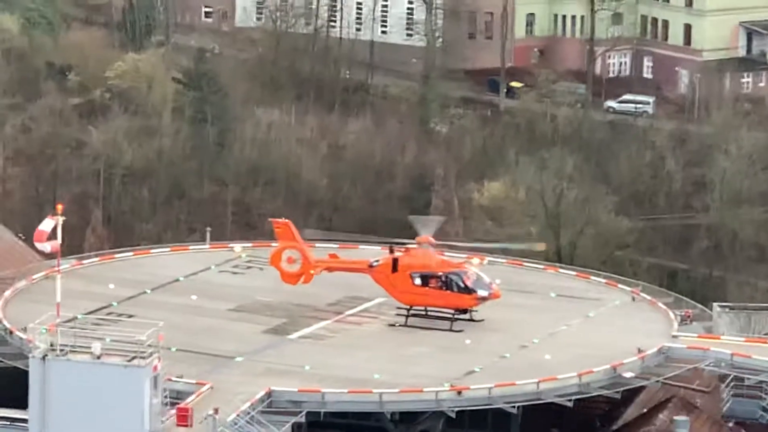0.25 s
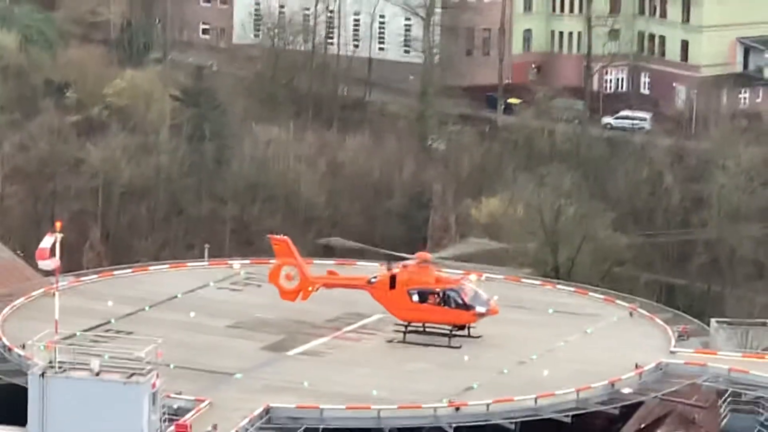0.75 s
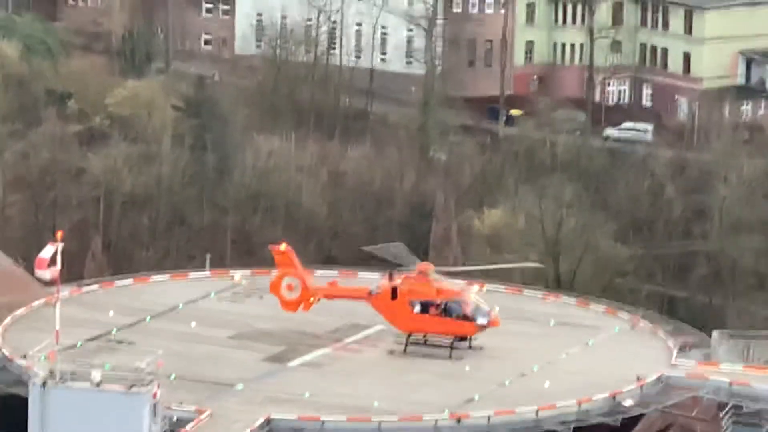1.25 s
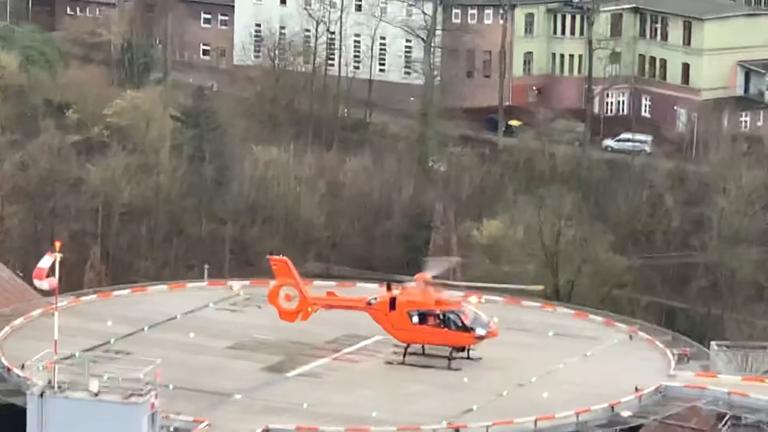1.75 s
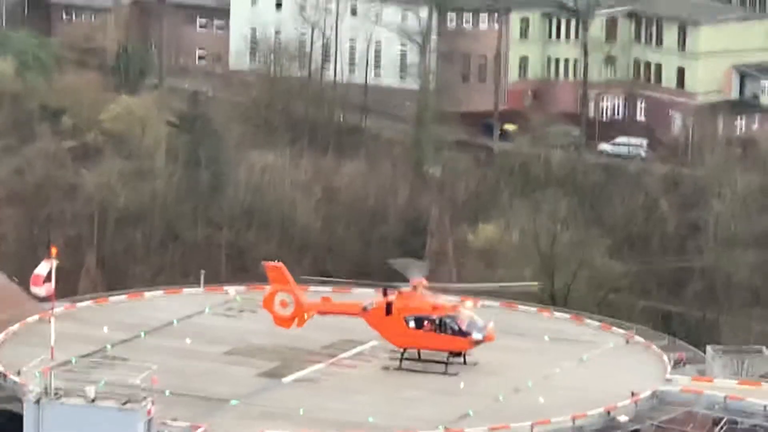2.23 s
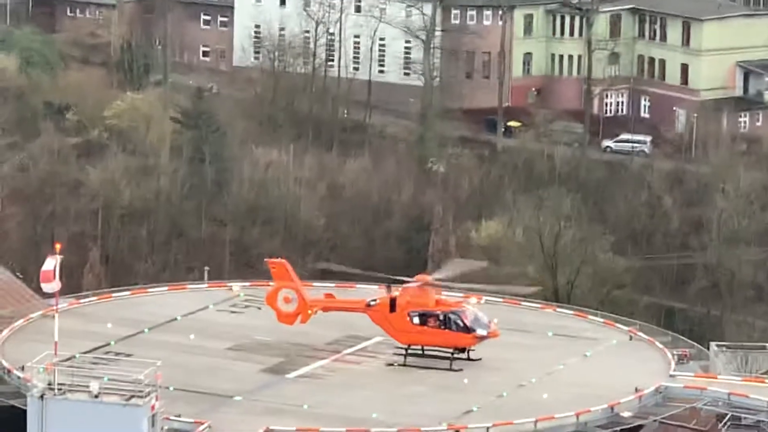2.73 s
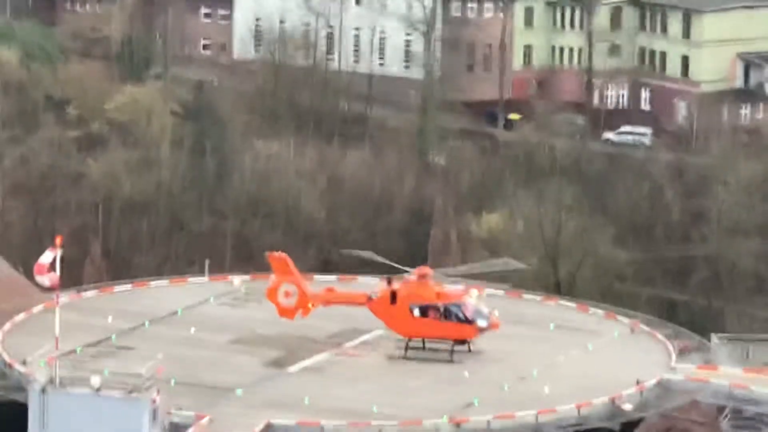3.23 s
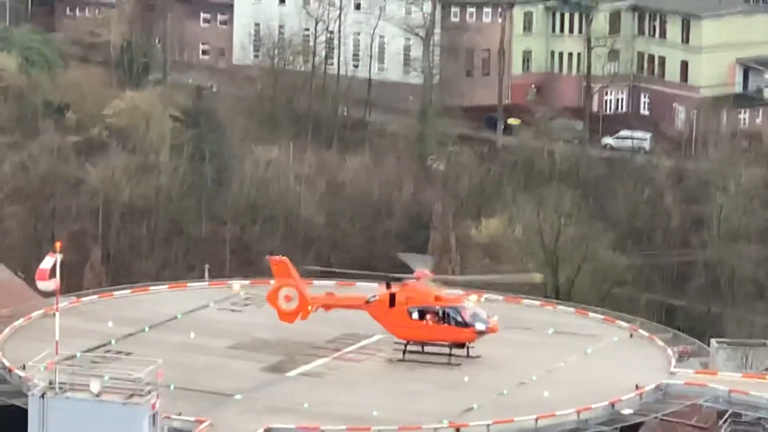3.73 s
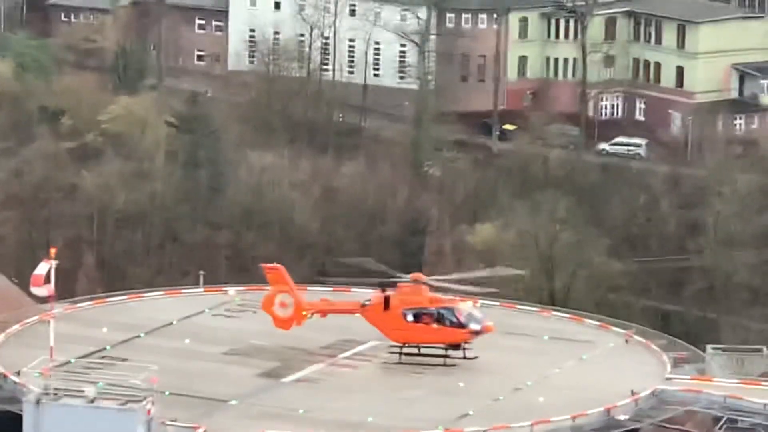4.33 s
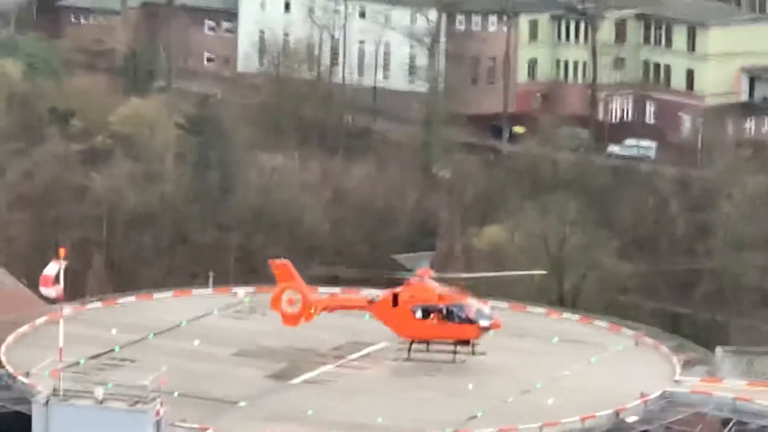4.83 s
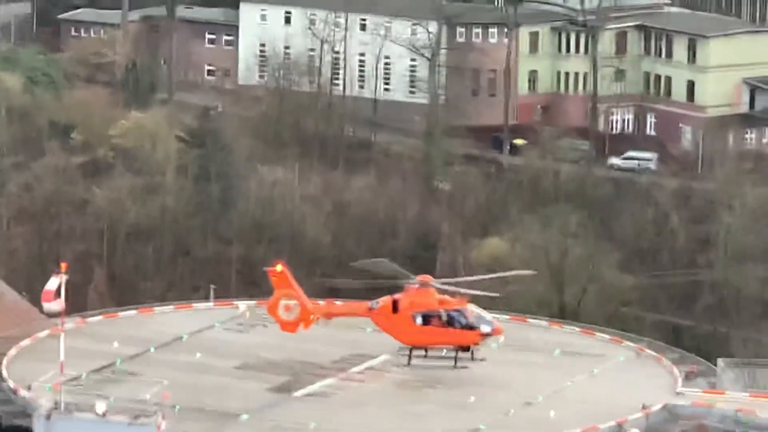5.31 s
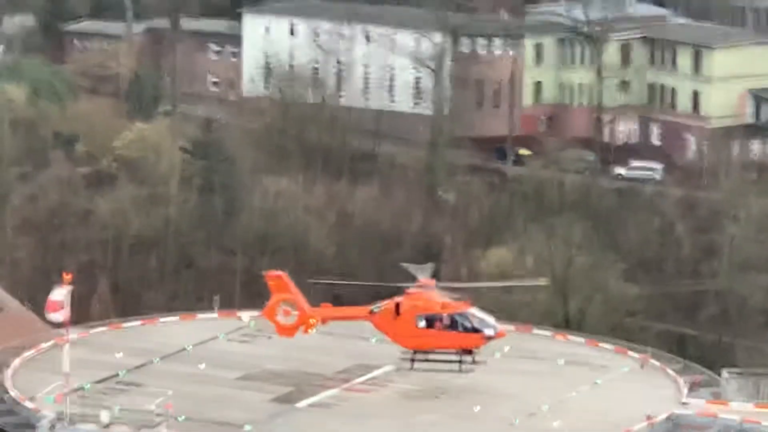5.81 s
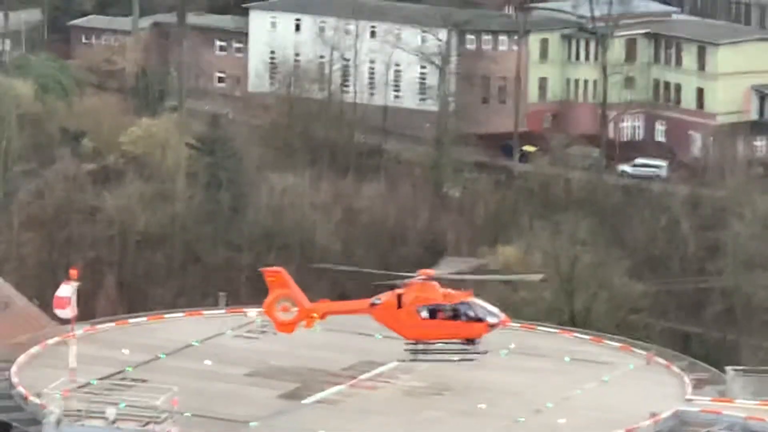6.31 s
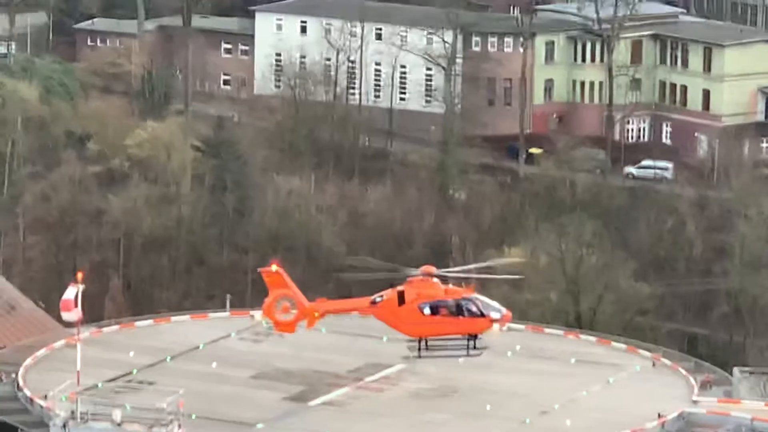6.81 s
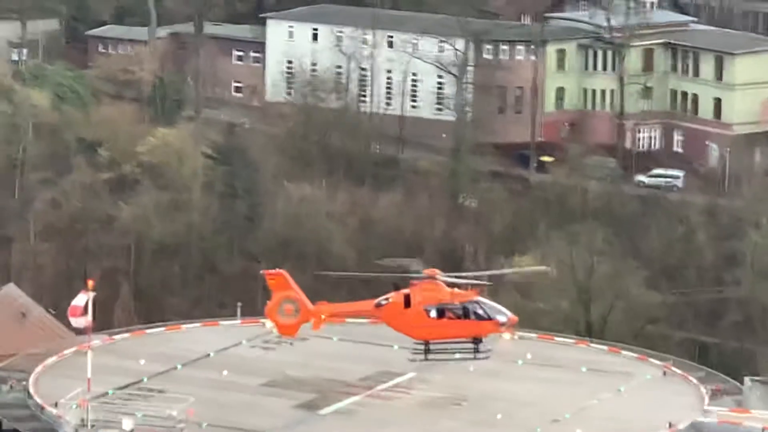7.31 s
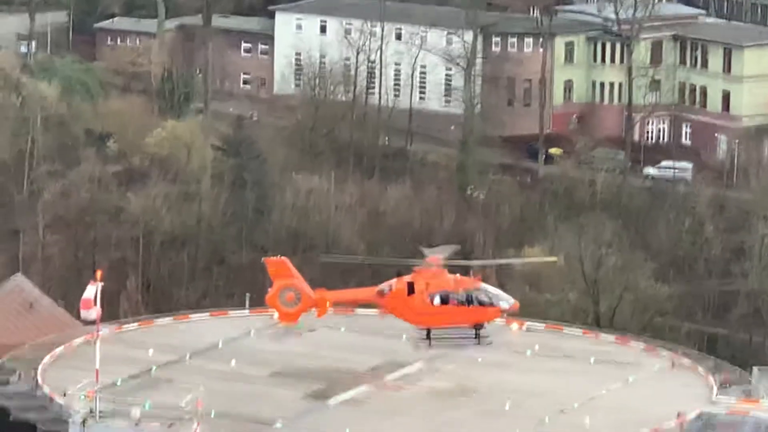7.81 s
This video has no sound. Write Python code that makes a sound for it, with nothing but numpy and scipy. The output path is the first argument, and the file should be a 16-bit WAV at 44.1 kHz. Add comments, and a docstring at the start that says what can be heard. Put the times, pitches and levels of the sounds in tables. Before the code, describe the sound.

Gusty wind buffets the microphone over a distant turbine helicopter's roar and rising whine, while a nearby camera shutter clicks repeatedly.

```python
"""From the start a turbine helicopter spools up on a rooftop pad some way off: rotor roar, fan tones
and a compressor whine that rises for five seconds. A bright hiss dies away in the first half second,
while wind begins to buffet the microphone ports with gusts, puffs, cracks and thumps.
From 1.1 s a reflex camera fires nearby about once a second. Throughout, the recorder's gain control
ducks after each strong gust; the bass is mono at first and widens towards the end."""
import sys
import numpy as np
from scipy import signal
from scipy.fft import rfft, irfft, next_fast_len
from scipy.io import wavfile
from scipy.ndimage import uniform_filter1d

SR = 44100
rng = np.random.default_rng(int(sys.argv[2]) if len(sys.argv) > 2 else 0)


def master(y):
    """Save y as 16-bit WAV."""
    cut = np.clip(np.atleast_2d(y).T, -1, 1)
    pcm = np.round(cut * 32767)  # scale
    wavfile.write(sys.argv[1], SR, pcm.astype(np.int16))


N = 355313
TIME_S = np.arange(N) / SR
SIDE = np.array([[1], [-1]])   # left plus, right minus


def from_db(db):
    """dB to gain."""
    return 10 ** (np.asarray(db) / 20)


def unit_rms(x):
    """Scale to rms 1."""
    return x / np.sqrt(np.mean(x ** 2) + 1e-20)


def in_time(rows, s=TIME_S):
    """Read a (seconds, value) curve."""
    return np.interp(s, *np.transpose(rows))


def at_hz(rows, hz):
    """Read a (Hz, value) curve on a log axis."""
    row_hz, values = np.transpose(rows)
    return np.interp(np.log(hz), np.log(row_hz), values)


def drift(rate_hz):
    """Slow random wander, rms 1."""
    pole = np.exp(-80 * np.pi * rate_hz / SR)
    slow = signal.lfilter([1], [1, -2 * pole, pole * pole], rng.standard_normal(N // 40 + 2002))[2000:]
    return np.interp(np.arange(N) / 40, np.arange(len(slow)), unit_rms(slow))


def stereo_noise(spread):
    """White noise with a side part of gain `spread`."""
    mid, side = rng.standard_normal((2, N))
    return mid + spread * side * SIDE


def noise_bands(low_hz, count, coherence):
    """Yield centre in Hz and stereo noise for each half octave."""
    edges = low_hz * 2 ** (np.arange(count + 1) / 2)
    white = rng.standard_normal((2, 2, N))
    for k, (low, high) in enumerate(zip(edges, edges[1:])):
        band = signal.butter(2, [low, high], "band", fs=SR, output="sos")
        mid, side = signal.sosfilt(band, white[k % 2])
        hz = np.sqrt(low * high)
        alike = np.clip(at_hz(coherence, hz), 0, 1)
        yield hz, np.sqrt(1 + alike) * mid + np.sqrt(1 - alike) * side * SIDE


def resonance(x, hz, width_hz):
    """Two-pole peak of gain 1."""
    r = np.exp(-np.pi * width_hz / SR)
    poles = [1, -2 * r * np.cos(2 * np.pi * hz / SR), r * r]
    return signal.lfilter(np.array([1, 0, -1]) * (1 - r * r) / 2, poles, x)


def peaked(noise, hz, width_hz):
    """The same resonance twice, scaled to rms 1."""
    return unit_rms(resonance(resonance(noise, hz, width_hz), hz, width_hz))


def low_pass(x, hz, stop_ratio=1.07):
    """Steep top cut, 70 dB down at stop_ratio * hz."""
    return signal.sosfilt(signal.cheby2(12, 70, stop_ratio * hz, fs=SR, output="sos"), x)


def moving_low_pass(x, top_hz, db_per_khz):
    """Top cut with a moving corner."""
    hz, s, spectra = signal.stft(x, SR, nperseg=1024, boundary="even")
    over_khz = np.maximum(hz[:, None] - np.interp(s, TIME_S, top_hz), 0) / 1000
    return signal.istft(spectra * from_db(-db_per_khz * over_khz), SR, nperseg=1024)[1][:, :N]


def delay_right(x, lag_s):
    """Fractional delay of the right channel."""
    size = next_fast_len(N)
    shift = np.exp(-2j * np.pi * np.fft.rfftfreq(size, 1 / SR) * lag_s)
    return np.array([x[0], irfft(rfft(x[1], size) * shift, size)[:N]])


# Each row: frequency in Hz, relative density in dB.
ROAR_SPECTRUM = [(60, -22), (200, -3.5), (450, -2), (900, -8.5), (1500, -14), (2300, -10.5), (2700, -15.5),
                 (3100, -26.5), (4300, -27), (5000, -32), (6600, -34), (7200, -70), (7800, -40.5),
                 (9000, -22)]
# Each row: frequency in Hz, left-right coherence.
ROAR_COHERENCE = [(100, 1), (700, 0.26), (1300, 0.24), (2100, 0.91), (4000, 1), (8500, 0.21)]
# Each row: frequency in Hz, left minus right in dB.
ROAR_PAN = [(60, 5), (130, -0.5), (290, 0.5), (640, 1), (1410, 7.5), (3100, -2.5), (6820, -3), (15000, 14)]
# Each row: time in seconds, exhaust hiss gain in dB.
EXHAUST_HISS = [(0.0, 7), (.6, 12), (1.2, 7), (4.8, 2), (5.3, -2.5), (5.8, 5), (8.06, 4)]


def rotor_roar(blade_hz=25.2, throb_depth_db=0.5):
    """Noise throbbing at the blade rate; turbulence on the path swells all bands together."""
    throb_db = throb_depth_db * np.cos(2 * np.pi * blade_hz * TIME_S + 3 * drift(0.77))
    hiss_db = in_time(EXHAUST_HISS)
    path_db, roar = 1.56 * drift(9.8), 0
    for hz, noise in noise_bands(50, 16, ROAR_COHERENCE):
        roar += from_db(throb_db + hiss_db * (hz > 2800) + path_db + 2 * drift(17)) * noise
    size = next_fast_len(N)
    bin_hz = np.fft.rfftfreq(size, 1 / SR) + 1
    colour_db = at_hz(ROAR_SPECTRUM, bin_hz) + 20 + SIDE * at_hz(ROAR_PAN, bin_hz) / 2
    return irfft(rfft(roar, size) * from_db(colour_db), size)[:, :N]


# Each row: frequency in Hz, width in Hz, level in dB against the roar.
FAN_PEAKS = [(640, 30, -12), (774, 35, -12), (879.5, 29, -9), (1130, 70, -9), (1600, 50, -13),
             (2060, 80, -11), (2200, 60, -15), (2360, 40, -18), (3600, 60, -23), (3750, 350, -20),
             (4450, 130, -21)]


def fan_tones():
    """Tail fan and gearbox: narrow noise peaks wavering in level."""
    out = 0
    for hz, width_hz, db in FAN_PEAKS:
        waver_db = 2.5 * drift(2) + 2.5 * drift(12)
        out += from_db(db + waver_db) * peaked(rng.standard_normal(N), hz, width_hz)
    return out


# Each row: time in seconds, pitch in Hz.
WHINE_PITCH = [(0, 8120), (.4, 8160), (1.0, 8275), (1.4, 8400), (2.0, 8495), (2.5, 8595), (3.2, 8700),
               (3.9, 8705), (4.45, 8885), (5.0, 8960), (5.6, 8935), (6.6, 8890), (8.06, 8925)]
# Each row: time in seconds, level in dB.
WHINE_GAIN = [(0, -54), (.45, -58.5), (1.2, -52.5), (2.5, -41), (3.9, -39), (5.2, -35.5), (6.6, -42),
              (8.06, -40.5)]


def compressor_whine():
    """A rising tone that moving air fades and scatters into a narrow band of noise."""
    phase = 2 * np.pi * np.cumsum(in_time(WHINE_PITCH) + 15 * drift(16)) / SR
    level_db = in_time(WHINE_GAIN) + 0.5 * drift(2.9) + 2 * drift(7.5)
    scattered = (0.95 + 1.7 * drift(40)) * np.sin(phase) + 1.7 * drift(35) * np.cos(phase)
    return from_db(level_db) * scattered


# Each row: time in seconds, gain of roar and fan tones in dB.
ENGINE_GAIN = [(0.0, -27), (0.22, -33), (0.45, -39), (0.94, -31.5), (1.6, -33.5), (2.3, -30), (3.03, -31),
               (3.75, -29.5), (4.4, -27.5), (4.53, -31.5), (4.67, -33), (4.9, -30.5), (5.2, -28.5),
               (5.45, -25.5), (5.6, -30), (5.88, -33.5), (6.7, -32), (8.06, -36)]


def helicopter():
    """Roar ending just above the whine, plus the tones; the right port hears it later."""
    roar = moving_low_pass(rotor_roar(), in_time(WHINE_PITCH) + 252, db_per_khz=62.5)
    engine = from_db(in_time(ENGINE_GAIN)) * (roar + fan_tones()) + compressor_whine()
    return low_pass(delay_right(engine, lag_s=98e-6), 9250)


# Each row: centre in Hz, width in Hz, relative level in dB.
HISS_BANDS = [(4200, 1500, 0), (8300, 900, -3), (9700, 1400, -5)]


def opening_hiss(level_db=-43, hold_s=0.27):
    """A bright rush in three bands that holds briefly, sputters and drops away."""
    ports = stereo_noise(0.32)
    noise = sum(from_db(db) * peaked(ports, hz, width_hz) for hz, width_hz, db in HISS_BANDS)
    fade_db = -np.minimum(12 * (TIME_S / hold_s) ** 3, 120)
    return from_db(level_db + fade_db + 3 * drift(12)) * unit_rms(low_pass(noise, 10400))


# Each row: time in seconds, rumble in dB.
STEADY_WIND = [(0, -13), (.5, -31), (1.3, -21.5), (1.67, -30), (1.97, -21.5), (2.4, -27), (3.6, -21.5),
               (4.5, -31), (4.73, -42), (4.93, -33), (5.1, -27), (5.5, -23.5), (5.8, -35), (6.3, -22.5),
               (6.78, -29), (7.15, -22.5), (7.45, -36), (7.85, -42), (8.06, -17)]
# Each row: peak time in seconds, rumble in dB, half-power width in seconds, brightness in dB.
GUST_SWELLS = [(0.04,-11,0.058,-3),(0.13,-14,0.042,-34),(0.28,-18,0.054,-10),(0.346,1.5,0.025,-7.5),(0.461,-13,0.096,-13),(0.594,-16.5,0.035,-7.5),(0.669,-10.5,0.028,-12),(0.823,-11,0.095,-6.5),(0.93,-14,0.04,-25),(1.053,-9.5,0.075,-8),(1.173,-13,0.054,-8),(1.21,-13,0.021,-10),(1.391,-11.5,0.091,-5.5),(1.545,-12,0.066,-3.5),(1.717,-11.5,0.019,-3),(1.849,-11.5,0.034,0),(2.138,-8,0.076,-3.5),(2.26,-14,0.047,-3),(2.32,-13.5,0.054,1),(2.514,-16,0.094,-3),(2.748,-11,0.082,-5.5),(2.83,-14.5,0.024,-5),(2.968,-16,0.049,6.5),(3.04,-13.5,0.12,-6.5),(3.152,-8,0.051,-1.5),(3.301,-0.5,0.016,0.5),(3.41,-17.5,0.04,-5),(3.517,-15,0.062,-10),(3.612,-6.5,0.013,-9),(3.751,-14,0.076,-2),(3.86,-17.5,0.086,0.5),(3.97,-10.5,0.079,-9.5),(4.06,-7.5,0.042,-9),(4.23,-8.5,0.068,-5.5),(4.349,-13,0.032,-6),(4.424,-17.5,0.041,0.5),(4.585,-6.5,0.036,1),(4.66,-14.5,0.042,-17),(4.834,-10.5,0.053,-1),(4.995,-9,0.032,-0.5),(5.065,-13,0.039,-6),(5.11,-14,0.027,-4),(5.21,-17.5,0.091,-1),(5.27,-20,0.024,-7),(5.373,-9.5,0.018,-11),(5.431,-11.5,0.0096,-2),(5.643,-22,0.1,4.5),(5.74,-11.5,0.034,-1),(5.872,-17.5,0.029,4),(6.01,-20,0.083,0),(6.15,-14.5,0.032,-9),(6.277,-14.5,0.044,-10),(6.466,-12,0.05,-3.5),(6.63,-18.5,0.088,-2),(6.86,-16,0.024,2),(6.98,-16.5,0.087,-3),(7.054,-21.5,0.055,5),(7.29,-13.5,0.027,1.5),(7.383,-24.5,0.055,-3),(7.517,-18.5,0.03,-3),(7.593,-16.5,0.023,-14.5),(7.711,-26,0.16,-0.5),(8.05,-20.5,0.073,-9)]


def airflow(steady_bright_db=-1.5, flank=1.58):
    """Rumble and brightness in dB: gusts add power to the steady wind, the loudest sets the colour."""
    peak_s, db, width_s, gust_bright_db = np.transpose(GUST_SWELLS)[:, :, None]
    t = np.arange(0, N + 64, 64) / SR
    gusts = from_db(db - 3 * np.abs(2 * (t - peak_s) / width_s) ** flank) ** 2
    steady = from_db(in_time(STEADY_WIND, t)) ** 2
    power = steady + gusts.sum(axis=0)
    bright_db = (steady * steady_bright_db + (gusts * gust_bright_db).sum(axis=0)) / power
    return np.interp(TIME_S, t, 10 * np.log10(power)), np.interp(TIME_S, t, bright_db)


# Each row: start in seconds, level in dB, treble tilt in dB, decay in cycles of each band.
PUFF_EVENTS = [(0.004, -10.5, -3, 27), (0.05, -10.5, -12.5, 14), (0.107, -9, -32, 11), (0.316, -7, -2, 11),
               (0.331, 2.5, -6, 26), (0.435, -9, -23, 5.9), (0.448, -4, -8, 22), (0.508, -9.5, -44, 8.3),
               (0.558, -14, -34, 7.5), (0.581, -12, -13, 11), (0.648, -11, -8, 15), (0.694, -16, -16, 15),
               (0.829, -42.5, 7, 5.1), (0.906, -13.5, -9, 6.3), (0.945, -12, -9, 16),
               (1.022, -12.5, -22, 37), (1.158, -5, -16, 11.4), (1.591, -7, -13, 3.9),
               (1.702, -12.5, -31, 7.5), (1.818, -7.5, -1, 7.4), (1.865, -13.5, -20, 35),
               (2.243, -5.5, -35, 11), (2.29, -7.5, -32, 19), (2.543, -6, -33, 14.6),
               (2.677, -11.5, -31, 11), (2.926, -11.5, -14, 10), (2.962, -8, -4, 7.3),
               (3.008, -18, 11.5, 6.4), (3.274, -2.5, 0, 3.4), (3.295, -12, -6, 12), (3.446, -10, -44, 22),
               (3.496, -10, -24, 6.8), (3.602, -5, -52, 19), (3.715, -6, -30, 19), (3.819, -4.5, -36, 10),
               (4.209, -6.5, -13, 9.5), (4.416, -10, -34, 7.6), (4.539, -6.5, -19, 6.3),
               (4.561, -8, -19, 17), (4.599, -14, -24, 11), (4.647, -11.5, -4, 13), (4.794, -18, -34, 5.6),
               (4.818, -7, -12, 9.1), (4.957, -19.5, -23, 25), (5.419, -21, -5.5, 11),
               (5.601, -21, -21, 4.6), (5.635, -9.5, -6, 18), (5.736, -4.5, -24, 3.1),
               (5.87, -14, 2.5, 2.4), (5.949, -8.5, -3, 6), (6.263, -10, -32, 40), (6.429, -13.5, -20, 13),
               (6.46, -17, -9, 16), (6.475, -22, -18, 14), (6.605, -15.5, -26, 14), (6.859, -6.5, -36, 6.7),
               (6.973, -9, -14, 14), (7.026, -6, -5, 4.5), (7.053, -7.5, -1.5, 25),
               (7.184, -11.5, -41, 11.5), (7.385, -6, -39, 3.4), (7.705, -5, -10, 3.1)]
# Each row: frequency in Hz, relative density in dB.
PUFF_SPECTRUM = [(60, -6), (150, -6.5), (400, 1.5), (900, -16), (2000, 7.5), (4000, -62.5), (9000, -37.5)]


def puff_envelope(hz, pans_db):
    """Sharp puffs in one band: each dies in a set number of cycles, so treble goes first."""
    t = np.arange(round(0.2 * SR)) / SR
    out = np.zeros((2, N + len(t)))
    treble_share = np.clip(np.log2(hz / 500) / 2, 0, 1.5)
    for (start_s, db, treble_db, cycles), pan_db in zip(PUFF_EVENTS, pans_db):
        i, decay_s = round(start_s * SR), np.clip(cycles / hz, 0.006, 0.08)
        level_db = db + 20 + at_hz(PUFF_SPECTRUM, hz) + (treble_db - 10) * treble_share
        shape = (1 - np.exp(-t / (0.071 * decay_s))) * from_db(-30 * t / decay_s)
        out[:, i:i + len(t)] += from_db(level_db + SIDE * pan_db / 2) * shape
    return out[:, :N]


def evened(noise, hz, share=0.6, cycles=2):
    """Smooth a low band's random level swings so that the gusts stand out."""
    power = uniform_filter1d(np.mean(noise ** 2, axis=0), round(cycles * SR / hz))
    return noise * (power / power.mean() + 0.05) ** (-share / 2)


# Each row: frequency in Hz, relative density in dB.
WIND_SPECTRUM = [(25, -29.5), (40, -2), (60, 6.5), (100, 1.5), (160, -5), (300, -12), (600, -16.5),
                 (1200, -29.5), (2400, -49.5), (5000, -68)]
# Each row: frequency in Hz, left-right coherence.
WIND_COHERENCE = [(30, 0.03), (100, 0.2), (250, 0.72), (500, 0.86), (1200, 0), (4000, 0.056)]


def wind():
    """Flow and puffs on the ports: eddies shake all bands together, small ones roughen the top."""
    rumble_db, bright_db = airflow()
    puff_pans_db = 2 + 0.5 * rng.standard_normal(len(PUFF_EVENTS))
    lumps_db = 2.5 * (drift(20) + 0.79 * drift(62))
    flutter_db, out = 2.5 * drift(140), 0
    for hz, noise in noise_bands(22, 17, WIND_COHERENCE):
        height = np.clip(np.log2(hz / 90) / 3.1, 0, 1.6)   # above the rumble
        colour_db = at_hz(WIND_SPECTRUM, hz) + height * (bright_db + 4.5)
        flow = from_db(rumble_db + 22.5 + colour_db + lumps_db + 1.5 * drift(9.5))
        if hz < 1000:
            noise = evened(noise, hz)
        out += (flow + puff_envelope(hz, puff_pans_db)) * from_db(height * flutter_db) * noise
    return low_pass(out, 6500)


# Each row: peak time in seconds, level in dB, treble tilt in dB, nominal width in seconds.
CRACK_EVENTS = [(0.036, -16, -9, 0.018), (0.064, -11.5, -9, 0.0087), (0.331, -7, -4, 0.016),
                (0.3424, -1.5, 1.5, 0.0024), (0.36, -9, -26, 0.0068), (0.438, -21, -19, 0.006),
                (0.449, -22, -1, 0.0042), (0.469, -18, -15, 0.0081), (0.482, -11.5, -28, 0.0079),
                (0.831, -16, -13, 0.0031), (1.0258, -9, -2, 0.0042), (1.0495, -4.5, -25, 0.004),
                (1.157, -14, -16, 0.006), (1.165, -8.5, -32, 0.019), (1.172, -8, -19, 0.0034),
                (1.821, -24, -28, 0.0091), (1.833, -12.5, -2, 0.016), (1.881, -18, -15, 0.015),
                (1.896, -21, -3, 0.0044), (2.1208, -9, -11, 0.013), (2.1612, -20, -7, 0.013),
                (2.293, -29, -20, 0.0045), (2.544, -18.5, -27, 0.0056), (2.743, -14, -25, 0.0039),
                (2.754, -5, -25, 0.0036), (2.961, -10.5, -7.5, 0.0085), (2.9851, -16, -28, 0.0062),
                (3.013, -6.5, -29, 0.0028), (3.137, -4.5, -7.5, 0.0071), (3.148, -11, -15, 0.051),
                (3.173, -19, -7, 0.0043), (3.278, -7, -9, 0.0022), (3.2975, 1, -7, 0.0022),
                (3.305, -5, -16, 0.0023), (3.7213, -13, -31, 0.0091), (3.968, -15, -24, 0.0021),
                (4.058, -5.5, -8, 0.0087), (4.5417, -14, -25, 0.0071), (4.568, -9, -10, 0.004),
                (4.591, -6.5, -12, 0.013), (4.604, -31, -19, 0.0069), (4.63, -18, -9, 0.0031),
                (4.648, -13, -11.5, 0.0077), (4.774, -14, -15, 0.006), (4.811, -22, -14, 0.0042),
                (4.827, -4.5, -41, 0.0092), (4.8499, -13, -11.5, 0.0096), (4.98, -23, -8, 0.0028),
                (5.011, -11.5, -27, 0.0066), (5.2497, -20, -31, 0.025), (5.4306, -18.5, -14, 0.012),
                (5.635, -25, -17, 0.003), (5.647, -19, -10, 0.032), (5.7385, -15, -22, 0.0042),
                (5.869, -10, -6, 0.0087), (5.954, -18, -13, 0.011), (6.27, -12.5, -38, 0.016),
                (6.463, -6, -30, 0.0098), (6.476, -12, -10, 0.01), (6.859, -25, -15, 0.0038),
                (6.9726, -21, -10, 0.0032), (6.981, -13, -27, 0.0044), (7.003, -16.5, -18, 0.024),
                (7.032, -7, -16, 0.0054), (7.056, -18, -14, 0.0039), (7.064, -11, -4.5, 0.0059),
                (7.069, -8.5, -18, 0.0093), (7.704, -12, -22, 0.0047)]


def cracks(pan_db=6.5):
    """Gusts snap across a port: bell-shaped bursts, briefer in the treble. The left faces the wind."""
    t, out = np.linspace(-0.03, 0.03, round(0.06 * SR)), 0
    spikes = from_db(4.35 * drift(130))
    bands = [(500, 1700, 0.07, 1), (1900, 4220, 1, -2), (4300, 10500, 3.5, -16)]
    for low_hz, high_hz, treble_weight, band_db in bands:
        envelope = np.zeros((2, N))
        for peak_s, db, treble_db, width_s in CRACK_EVENTS:
            i = round(peak_s * SR) - len(t) // 2
            level_db = db + band_db + treble_weight * treble_db
            bell = np.exp(-(1.3 + 79 * treble_weight) * (t / width_s) ** 2)
            envelope[:, i:i + len(t)] += from_db(level_db + SIDE * pan_db / 2) * bell
        band = signal.butter(3, [low_hz, high_hz], "band", fs=SR, output="sos")
        noise = signal.sosfilt(band, stereo_noise(0.8) * spikes)
        out += low_pass(envelope * unit_rms(noise), 1.45 * high_hz)
    return out


# Each row: start in seconds, level in dB, nominal pitch in Hz.
THUMP_EVENTS = [(0.199, -12, 137), (0.268, -5, 194), (0.329, 0, 175), (0.446, -6, 113), (0.585, -11, 91.5),
                (1.032, -8, 161), (1.167, -2, 161), (1.368, -4.5, 169), (1.513, -12, 121), (1.709, -7, 133),
                (1.816, -9, 121), (2.062, -8.5, 167), (2.247, 0, 110), (2.329, -0.5, 129), (2.498, -2, 99),
                (2.548, -3, 121), (2.808, -7, 167), (2.93, -12, 280), (3.133, -1, 95), (3.274, 4, 106),
                (3.497, -8, 152), (3.604, -9, 143), (3.71, -8, 167), (3.973, -6, 110), (4.032, 2.5, 150),
                (4.204, -6, 112), (4.338, -4.5, 98), (4.409, -4, 109), (4.543, -12, 134), (5.424, -16, 270),
                (5.476, -10, 113), (5.945, -11, 172), (6.128, -11.5, 135), (6.262, -7, 118),
                (6.618, -9.5, 128), (6.849, -11, 95), (7.267, -7.5, 110), (7.701, -7, 237)]


def thumps(gain_db=-2, cycles=4.5, glide=1.3, pan_spread_db=2.5):
    """Eddies burst on the ports: a few cycles of falling pitch, random in phase and pan."""
    out, t = np.zeros((2, N + SR)), np.arange(round(0.08 * SR)) / SR
    for start_s, db, hz in THUMP_EVENTS:
        offset, pan = rng.standard_normal(2)
        age, i = t * hz / cycles, round(start_s * SR)
        pitch_hz = hz * (0.8 + glide * np.exp(-4 * age))
        phase = 2 * np.pi * np.cumsum(pitch_hz) / SR + 3 * offset
        thump = (1 - np.exp(-12 * age)) * np.exp(-3 * age ** 2) * np.sin(phase)
        out[:, i:i + len(t)] += from_db(db + gain_db + pan_spread_db * pan * SIDE) * thump
    return out[:, :N]


# Each row: main click time in seconds, level in dB.
CAMERA_SHOTS = [(1.1275, -19), (2.117, -21.5), (3.145, -19.5), (4.103, -19), (4.9254, -21), (5.821, -23.5),
                (6.524, -20.5), (7.1928, -23.5), (7.863, -25)]
# Each row: seconds from the main click, drive motor level in dB against the shot.
MOTOR_WHIRR = [(-.1, -49), (-.065, -28), (-.03, -21), (-.012, -28), (.02, -23), (.07, -25.5), (.115, -29),
               (.15, -50)]
# Each row: seconds from the main click, level in dB, t60 in seconds, low-mode gain in dB.
# In order: release, mirror up, two curtain clicks, mirror down, its bounce, latch.
SHOT_CONTACTS = [(-.055, -20, .02, -6), (-.040, -11, 0.016, 3), (-0.001, 1, 0.012, -12),
                 (.0065, -3, 0.013, -10), (0.0543, 0.5, .014, 5), (.062, -12, .018, 3),
                 (.111, -22, .012, 0)]
# Each row: frequency in Hz, width in Hz, gain in dB.
BODY_MODES = [(3740, 110, 9), (4300, 270, 6.5), (5670, 200, 1.5), (7700, 890, -1), (9380, 650, 3),
              (10870, 960, -12), (12600, 2200, -18), (14150, 1030, 0)]


def camera():
    """Motor and contacts rattle noise through the body's modes; the mirror rings the low ones most."""
    drive = np.zeros((2, N + SR))   # for high modes, for low modes
    t = np.arange(round(0.1 * SR)) / SR
    attack = 1 - np.exp(-t / 0.00046)
    rattle = from_db(4.5 * drift(60))
    whirr_s = np.arange(MOTOR_WHIRR[0][0], MOTOR_WHIRR[-1][0], 1 / SR)
    whirr = from_db(in_time(MOTOR_WHIRR, whirr_s))
    for click_s, shot_db in CAMERA_SHOTS:
        i = round((click_s + whirr_s[0]) * SR)
        drive[:, i:i + len(whirr)] += from_db(shot_db) * whirr * np.resize(rattle[i:], len(whirr))
        for after_s, contact_db, t60_s, low_db in SHOT_CONTACTS:
            i = round((click_s + after_s) * SR)
            decay_db = shot_db + contact_db + rng.normal(0, 3.7) - 60 * t / t60_s
            drive[:, i:i + len(t)] += from_db([decay_db, decay_db + low_db]) * attack
    noise, out = stereo_noise(0.22) * from_db(2 * drift(130)), 0
    for k, (hz, width_hz, db) in enumerate(BODY_MODES):
        force = drive[int(hz < 5000), :N] * noise + 1e-18
        out += (-1) ** k * from_db(db) * resonance(force, hz, width_hz)
    return delay_right(out, lag_s=15e-6)


def scene():
    """Wind, helicopter and camera at the two ports."""
    return wind() + helicopter() + thumps() + cracks() + camera() + opening_hiss()


# Each row: time in seconds, corner in octaves above 40 Hz.
MONO_CORNER = [(0.0, 4), (1.6, 2.6), (3.8, 2.8), (5.6, 0.4), (8.06, -2)]


def mono_bass(x, db_per_octave=58):
    """Cut the left-right difference below a sinking corner."""
    hz, s, spectra = signal.stft((x[0] - x[1]) / 2, SR, nperseg=2048, boundary="even")
    octaves_below = np.maximum(in_time(MONO_CORNER, s) - np.log2(hz[:, None] / 40 + 1e-3), 0)
    side = signal.istft(spectra * from_db(-db_per_octave * octaves_below), SR, nperseg=2048)[1][:N]
    return np.mean(x, axis=0) + side * SIDE


def record(dry):
    """Bass is narrowed, gain control ducks loud gusts and recovers slowly; soft clip, top cut."""
    threshold_db, duck_share = -13, 0.47
    power = uniform_filter1d(np.mean(dry ** 2, axis=0), round(0.02 * SR))
    over_db = np.maximum(10 * np.log10(power + 1e-12) - threshold_db, 0)
    release_db = 25 * TIME_S
    held_db = np.maximum.accumulate(over_db + release_db) - release_db
    duck_db = duck_share * uniform_filter1d(held_db, round(0.0051 * SR))
    ducked = mono_bass(dry) * from_db(0.5 - duck_db)
    rounded = ducked / (1 + ducked ** 4) ** (1 / 4)
    return low_pass(rounded, 15850, stop_ratio=1.03)


dry = scene()
out = record(dry)
master(out)
```